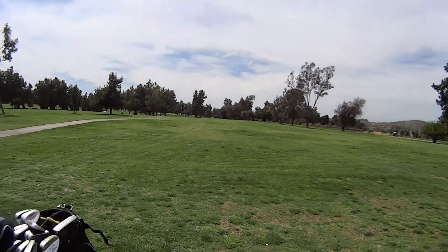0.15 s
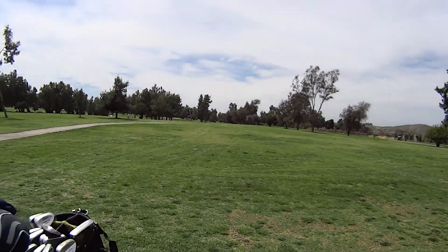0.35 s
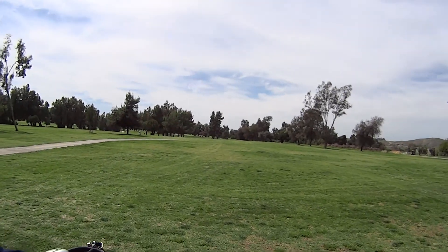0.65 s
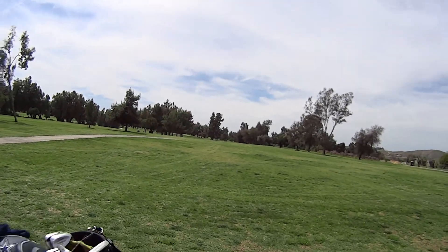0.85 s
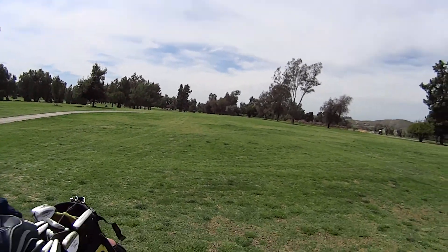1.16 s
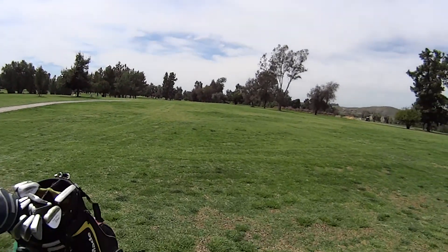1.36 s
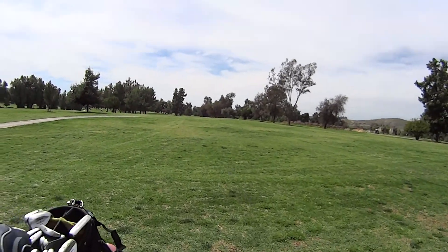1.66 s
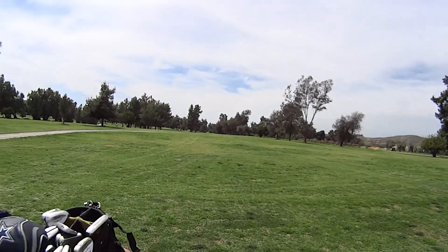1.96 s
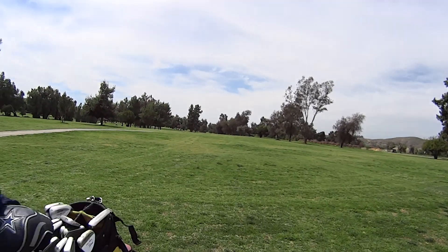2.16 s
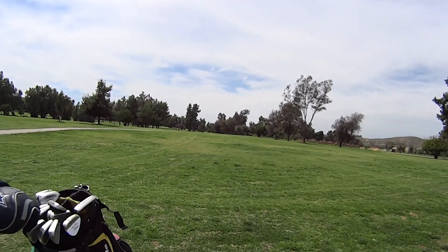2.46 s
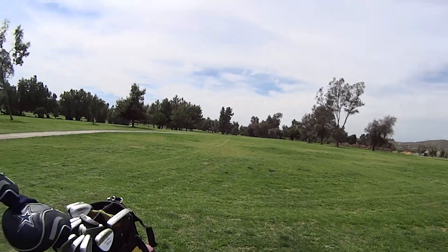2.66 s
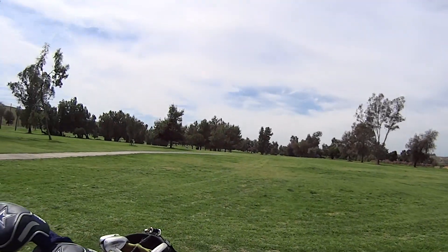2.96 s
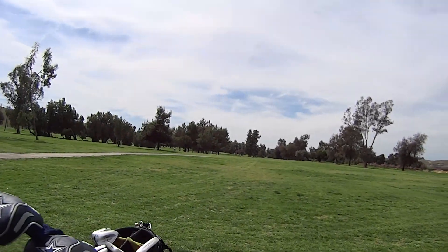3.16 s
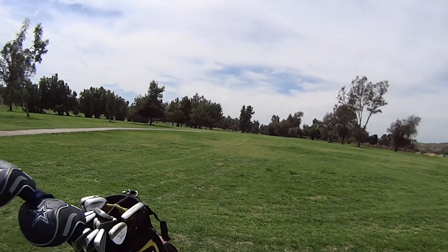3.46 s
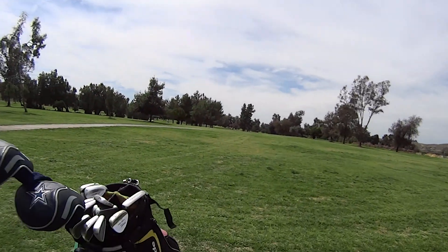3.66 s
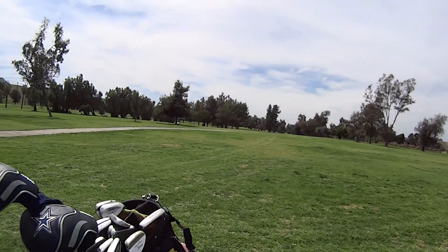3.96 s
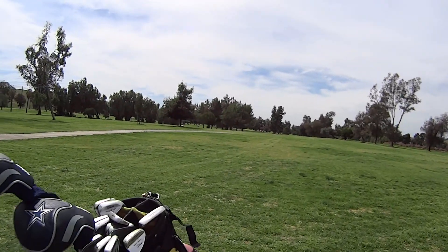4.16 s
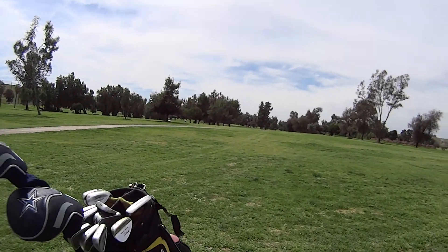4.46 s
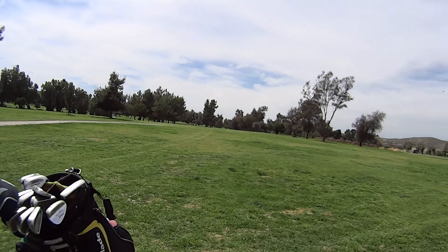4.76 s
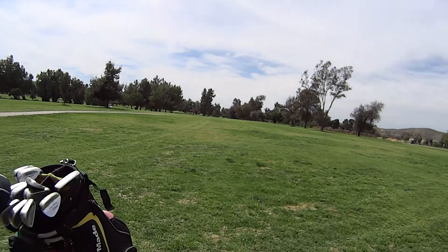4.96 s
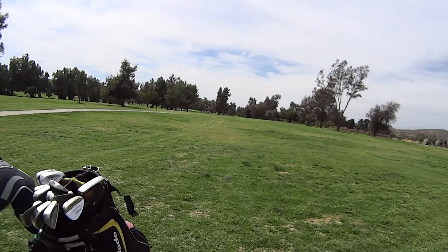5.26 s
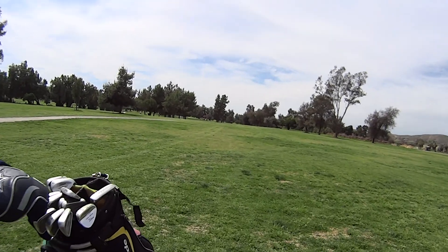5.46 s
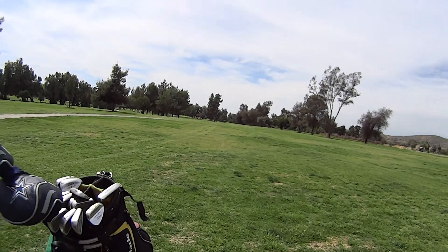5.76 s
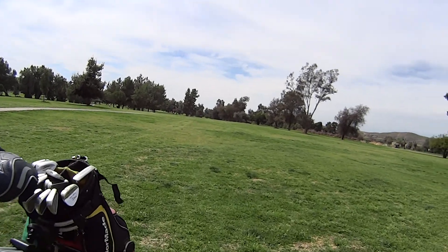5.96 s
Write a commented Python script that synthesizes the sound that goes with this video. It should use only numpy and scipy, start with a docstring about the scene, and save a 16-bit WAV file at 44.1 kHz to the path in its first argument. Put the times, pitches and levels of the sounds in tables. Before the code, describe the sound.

Outdoors on an open course, a bag of clubs is jostled beside a handheld camera. Bright dry clinks and lighter ticks build to a quick clattering burst, stop briefly, then return around two and three seconds. Later a club slides with a short scrape and a clink, and a few faint taps remain. Soft grass rolling, low wind, airy hiss and muffled handling thuds continue around it.

```python
"""Irons clack together in a golf bag that rides along an open course, close to the camera's microphone.
They rebound; each clack runs down a shaft and comes back smeared into a short chirp of echoes.
Loose shafts hold clean notes, one club slides on the bag's rim as slip noise, and dull handling
bumps on the camera ring damped low modes. Around them: steady outdoor hiss, rolling over grass
and the rumble of light wind, all shaped noise."""
import sys
import numpy as np
from scipy.fft import rfft, irfft, next_fast_len
from scipy.io import wavfile
from scipy.ndimage import map_coordinates

SR = 44100
rng = np.random.default_rng(int(sys.argv[2]) if len(sys.argv) > 2 else 0)


def master(y):
    """Save y as 16-bit WAV."""
    cut = np.clip(np.atleast_2d(y).T, -1, 1)
    pcm = np.round(cut * 32767)  # scale
    wavfile.write(sys.argv[1], SR, pcm.astype(np.int16))


N = 269010  # samples

# Club contacts, levels ahead of the stereo placing and the microphone ports: (time [s], clack level [dB],
# chatter rate [Hz], tilt [dB per octave], shaft level before the ring trim [dB], shaft note [Hz])
CONTACTS = [(0.0648, -35.5, 3110, -1, -41.5, 2090), (0.0953, -44, 2580, 2, -53, 2350),
            (.1424, -42.5, 2440, -2, -50, 2090), (.1863, -32, 2720, -0.5, -43, 2060),
            (0.316, -43.5, 2330, -5.5, -49, 2455), (0.3443, -45, 2430, -12, -52, 1970),
            (0.374, -47, 2740, -9, -55, 2140), (0.4893, -48, 1550, -5, -44, 2073),
            (0.5216, -45.5, 2610, -1.5, -43.5, 5200), (.64, -31.5, 3240, 3, -41, 2008),
            (.7071, -46, 3060, 2.5, -58, 2230), (.806, -31.5, 4500, 0, -39, 2530),
            (.8175, -39, 1810, -6, -42, 2035), (0.9556, -32.5, 1740, 6, -42, 4560),
            (.9882, -26, 3220, -0.5, -36, 3080), (1.0283, -46, 2560, -20, -49.5, 1550),
            (1.1154, -34, 1740, 0.5, -41.5, 3180), (1.14, -48, 1580, 2, -51, 1720),
            (1.1683, -29, 2300, -6.5, -40, 2040), (1.1798, -23, 1860, -3, -36, 2103),
            (1.2132, -29, 4400, 2.5, -39.5, 2990), (1.22, -29.5, 3100, 18, -44, 3170),
            (1.23, -33, 4930, -9, -47, 2160), (1.237, -34, 2270, -3, -43, 2650),
            (1.299, -40.5, 2400, -7, -44.5, 2390), (1.3184, -35.5, 4670, -1, -47, 2190),
            (1.342, -33.5, 1490, -4, -40, 1650), (1.35, -38, 5570, -10, -42, 4720),
            (1.357, -41, 2580, 7, -44.5, 2600), (1.3768, -36.5, 2380, -3.5, -45, 2360),
            (1.3872, -42, 1800, -2, -46, 2290), (1.419, -48, 2300, -4, -52, 2270),
            (1.4424, -38, 4450, -3, -41, 2000), (1.9365, -33, 1560, -3, -43.5, 2430),
            (2.0418, -39.5, 4870, -6.5, -46.5, 3940), (2.1869, -39, 2270, -3, -42, 2125),
            (2.2127, -35.5, 4420, -4, -43.5, 2050), (2.2218, -37, 1690, 0, -43.5, 2470),
            (2.2428, -46, 2510, -11, -54, 2340), (2.2789, -36, 4960, -5.5, -41.5, 2030),
            (2.3215, -37.5, 1504, -3, -48, 3300), (2.3602, -38, 3100, 3, -47.5, 3030),
            (2.683, -45.5, 2770, 3, -57, 2000), (2.7452, -45, 2460, -4, -49, 2430),
            (2.7883, -34, 4330, -4, -43.5, 2060), (2.887, -49.5, 2920, -5, -64, 2290),
            (3.042, -27, 4250, -1.5, -36.5, 2075), (3.0619, -43, 4770, -7.5, -46, 2490),
            (3.072, -46, 2460, -3, -49, 2000), (3.159, -45.5, 3980, -10, -61, 2400),
            (3.3872, -51, 2660, -4, -57.5, 2130), (3.5705, -37, 4570, -3, -45.5, 2020),
            (3.6082, -49, 2526, -2, -48.5, 2520), (3.6184, -43.5, 5170, -6, -49, 2580),
            (3.664, -49.5, 5300, -14, -66, 2090), (4.0404, -40, 4340, -10, -48, 2060),
            (4.1601, -47, 2480, 0.5, -56, 1690), (4.334, -51, 2410, -12, -57, 2350),
            (4.6726, -36.5, 2600, -4, -36.5, 2406), (4.6915, -44, 2220, -15, -47, 2150),
            (5.1573, -52, 2100, -18, -59, 2110), (5.2022, -38, 3190, -15, -47, 3060),
            (5.549, -52, 2430, -20, -57, 2120)]


def amp(db):
    """Decibels to an amplitude factor."""
    return 10 ** (np.asarray(db) / 20)


def unit(x):
    """x scaled to an rms of 1."""
    return x / np.sqrt(np.mean(x ** 2) + 1e-20)


def along(points, hz):
    """Interpolate (Hz, value) points on a log frequency axis."""
    f, v = np.transpose(points)
    return np.interp(np.log(hz + 1), np.log(f + 1), v)


def hump(hz, centre, width):
    """A resonance's outline: 1 at its centre, half at half its width away, 0 far off."""
    return 1 / (1 + (2 * (hz - centre) / width) ** 2)


def curves(rows):
    """One value per sample for each column after the time."""
    s, *columns = np.transpose(rows)
    return [np.interp(np.arange(N) / SR, s, column) for column in columns]


def swells(rows):
    """Gain per sample of smooth rises and falls; a length runs from the peak to e^-2 of it."""
    t = np.arange(N) / SR
    return sum(amp(db) * np.exp(-2 * ((t - s) / length) ** 2) for s, db, length in rows)


def wobble(rate):
    """A smooth random curve, rate knots a second."""
    knots = rng.standard_normal(int(N * rate / SR) + 4)
    return map_coordinates(knots, [np.arange(N) * rate / SR])


def filtered(x, response):
    """x passed through a response given as a function of frequency."""
    m = next_fast_len(N + SR // 2)
    return irfft(rfft(x, m) * response(np.fft.rfftfreq(m, 1 / SR)), m)[..., :N]


def causal(db):
    """The minimum-phase response with these gains, which rings only after the blow."""
    cepstrum = irfft(np.log(amp(db)))
    half = len(cepstrum) // 2
    fold = np.r_[1, np.full(half - 1, 2), np.zeros(half)]
    return np.exp(rfft(cepstrum * fold))


def add(track, s, sound):
    """Mix a sound in at time s."""
    part = track[..., max(round(s * SR), 0):][..., :sound.shape[-1]]
    part += sound[..., :part.shape[-1]]


def at_level(x, db, span):
    """x scaled to an rms level over its first span seconds."""
    energy = np.sum(x[..., :int(span * SR)] ** 2, axis=-1, keepdims=True)
    return x * amp(db) / np.sqrt(energy / (span * SR))


def rush(colour, alike):
    """Stereo noise of rms 1: colour gives dB by frequency, alike the left-right correlation."""
    def mid_side(hz):
        turn = np.arccos(np.clip(along(alike, hz), -1, 1)) / 2
        return amp(colour(hz)) * np.array([np.cos(turn), np.sin(turn)])

    mid, side = filtered(rng.standard_normal((2, N)), mid_side)
    return unit(np.array([mid + side, mid - side]))


def outdoors():
    """Steady hiss, the soft noise of rolling over grass, and wind rumble mostly alike in both ears."""
    # hiss and rumble spectra: (frequency [Hz], relative level [dB])
    hiss_colour = [(80, -10), (200, -7.5), (500, -2), (800, -2), (1400, -4.5), (2100, -4), (3300, -9),
                   (5300, -9), (7500, -12.5), (8600, -15.5), (10500, -14)]
    rumble_colour = [(10, -21), (20, -2.5), (32, -5), (44, 3.5), (60, -7.5), (87, -11.5), (200, -21),
                     (400, -25.5), (880, -68)]
    # stereo image of hiss and grass: (frequency [Hz], left-right correlation [-1 to 1])
    alike = [(100, 1), (300, -0.29), (650, -0.62), (1400, -0.6), (2400, 0.033), (5000, 0.33), (10000, 0.67)]
    # rolling over grass: (time [s], level before the trim and unsteadiness below [dB])
    rolling_levels = [(0, -59), (.2, -57), (.8, -62.5), (1.15, -58), (1.6, -61.5), (2.8, -64.5), (4.4, -68),
                      (5.1, -64.5), (6.1, -68)]
    # the wind freshens, on top of the calm: (time [s], level before the flutter [dB], length [s])
    gusts = [(.29, -57, .16), (1, -62, .15), (1.38, -55.5, 0.13), (1.97, -63, 0.078), (2.6, -60, 0.25),
             (4.88, -57, .09)]
    hiss_db, rolling_trim_db, calm_db = -56, -3, -62.5
    flutter_db, flutter_per_s = 1.2, 11  # quick unsteadiness of the wind

    hiss = rush(lambda hz: along(hiss_colour, hz), alike)
    grass_colour = [(50, -33), (130, 1), (350, -3.5), (900, -8.5), (2000, -7), (6000, -62)]
    grass = rush(lambda hz: along(grass_colour, hz), alike)
    rumble = rush(lambda hz: along(rumble_colour, hz), [(40, 1), (100, 0.93), (300, 0.77)])

    rolling, = curves(rolling_levels)
    grass_gain = amp(rolling + rolling_trim_db + 3.1 * wobble(18))
    wind_gain = (amp(calm_db) + swells(gusts)) * amp(flutter_db * wobble(flutter_per_s))
    return amp(hiss_db) * hiss + grass_gain * grass + wind_gain * rumble


def rubbing(rustle_trim_db=-1, rest_db=-68, unrest_db=2.0, slide_grain_db=3.0, rustle_grain_db=3.5):
    """Shafts rub on the bag in small slips: faintly as it sways, loudly when one club slides."""
    # the slide of one club: (time [s], scrape level before the stereo lean [dB])
    slide_levels = [(4.58, -58.5), (4.615, -57), (4.66, -50.5), (4.678, -43), (4.725, -48.5), (4.75, -53),
                    (4.78, -67)]
    # the bag sways and its shafts rub: (time [s], rustle level before the trim and lean [dB], length [s])
    sways = [(.323, -60.5, 0.14), (1.05, -60.5, 0.28), (1.357, -53, 0.18), (1.798, -56, 0.046),
             (2.172, -62.5, 0.14), (2.525, -60.5, 0.078), (3.141, -63, 0.2), (4.136, -59.5, 0.053),
             (4.403, -68, 0.21), (4.886, -62.5, 0.21), (5.32, -59, 0.058), (5.555, -60, 0.037)]
    # scrape and rustle spectra: (frequency [Hz], relative level [dB])
    scrape_colour = [(300, -17.5), (1200, -12.5), (1900, -3.5), (2230, 5.5), (2750, -14), (3800, -8),
                     (6000, -13), (8300, -20), (11000, -23)]
    rustle_colour = [(300, -20), (1400, -10), (1900, -8.5), (2200, 3), (2650, -11.5), (5300, -8.5),
                     (8000, -22), (11000, -25)]

    t = np.arange(N) / SR
    slide, = curves(slide_levels)
    sliding = (t > slide_levels[0][0]) & (t < slide_levels[-1][0])
    sway = amp(rest_db + unrest_db * wobble(7)) + amp(rustle_trim_db) * swells(sways)

    # fast random level changes give the noise its grain of slips
    scrape = rush(lambda hz: along(scrape_colour, hz), [(2000, 0.78)])
    scrape = unit(scrape * amp(slide_grain_db * wobble(260)))
    rustle = rush(lambda hz: along(rustle_colour, hz), [(2000, 0.66)])
    rustle = unit(rustle * amp(rustle_grain_db * wobble(170)))
    lean = amp([[1], [-1]])  # 1 dB up on the left, 1 dB down on the right
    return (sliding * amp(slide) * scrape + sway * rustle) * lean


def ticks(count=140):
    """Light contacts at random moments, more and firmer while the bag is jostled."""
    # how much the bag is jostled: (time [s], share of the full tick rate [0 to 1])
    jostling = [(0, .1), (.35, .6), (.7, .05), (1.25, 1), (1.55, .02), (2.25, .4), (2.5, .02), (3.2, .3),
                (3.8, .05), (6.1, .02)]
    full_per_s, tilt = 20, -8  # rate at full jostle [per second], tilt [dB per octave]
    clack_db, shaft_db = -47, -54.5  # mean levels at full jostle, the shaft before the ring trim
    spread_db, calm_db = 0.5, -6  # random spread, and how much lighter when the bag is still
    chatter_range, note_range = (2000, 4600), (1990, 2480)  # Hz

    when, chance, chatter, note = rng.random((count, 4)).T
    s = when * N / SR
    jostle = np.clip(np.interp(s, *np.transpose(jostling)), 0, 1)
    force_db = calm_db * (1 - jostle) + spread_db * rng.standard_normal(count)
    happens = chance < jostle * full_per_s * N / SR / count
    chatter_hz = np.interp(chatter, [0, 1], chatter_range)
    note_hz = np.interp(note, [0, 1], note_range)
    rows = np.column_stack([s, clack_db + force_db, chatter_hz, np.full(count, tilt),
                            shaft_db + force_db, note_hz])
    return rows[happens]


def rebounds():
    """The heads part and meet once more, softer and duller; a harder knock stays apart for longer."""
    flight_s, typical_db = .0072, -39  # flight after a typical clack, and the level of that clack
    flight_grows = .2  # dB of flight time per dB of clack
    softer_db, duller = -12, -4  # dB, dB per octave
    shaft_softer_db = -21  # it hardly shakes the shaft again
    rows = []
    for s, db, chatter_hz, tilt_db, shaft_db, ring_hz in CONTACTS:
        flight = flight_s * amp(flight_grows * (db - typical_db))
        rows.append((s + flight, db + softer_db, chatter_hz, tilt_db + duller,
                     shaft_db + shaft_softer_db, ring_hz))
    return rows


def clack(hz, db, chatter_hz, tilt_db, depth_db=5.5, ripple_db=2, pivot_hz=4000, smear=0.000389):
    """Two heads meet and chatter for a millisecond, which raises the multiples of the chatter rate."""
    # clack spectrum: (frequency [Hz], relative level [dB])
    clack_colour = [(300, -32.5), (1100, -35), (1800, -15.5), (3100, 4.5), (4400, 0.5), (5600, 3),
                    (7300, -6), (8600, -20), (9700, -21.5), (11500, -30.5)]
    # each contact has its own random ripple over frequency
    spot = np.interp(hz, np.linspace(0, SR / 2, num=48), rng.standard_normal(48))
    chatter = depth_db * np.cos(2 * np.pi * hz / chatter_hz)
    # hard contacts are bright, soft ones dull
    hardness = tilt_db * np.log2(np.maximum(hz, 1800) / pivot_hz)
    colour = along(clack_colour, hz) + chatter + hardness + ripple_db * spot
    # in the metal the treble runs slightly ahead: the delay is smear seconds at the pivot
    travel = np.exp(-4j * np.pi * smear * np.sqrt(hz * pivot_hz))
    return at_level(irfft(causal(colour) * travel), db, span=0.0013)


def steel(size, spread_db=5):
    """The heads ring briefly, with new strengths at every contact, damped by their neighbours."""
    # modes of the iron heads: (frequency [Hz], mean relative level [dB], t60 [s])
    head_modes = [(3285, 3, 0.065), (3315, 1, 0.17), (3960, 12, 0.037), (4250, -30, 0.061), (4260, 5, 0.05),
                  (5100, 16, 0.064), (5740, -4, 0.096), (6060, -5, 0.036), (7340, -6, 0.058)]
    t = np.arange(size) / SR
    hz, db, t60 = np.transpose(head_modes)[..., None]
    strength = amp(spread_db * rng.standard_normal(hz.shape))
    strength = strength * np.sign(rng.standard_normal(hz.shape))
    modes = strength * amp(db - 60 * t / t60) * np.sin(2 * np.pi * hz * t)
    return at_level(np.sum(modes, axis=0), 0, span=0.0056)


def shaft(hz, db, ring_hz, tilt_db, trip=.0043, trip_hz=2100, keep=0.59, scatter=1.0,
          tone=0.076, tone_t60=0.054, tilt_share=0.47):
    """Bending waves bounce along a shaft, treble first, settle into one mode and scatter into other clubs."""
    # shaft spectrum: (frequency [Hz], relative level [dB])
    shaft_colour = [(300, -29.5), (1100, -24), (1550, -7), (2100, 0.5), (3000, -4.5), (5200, -5),
                    (7000, -10), (8600, -21), (11000, -21.5)]
    t = np.arange(2 * (len(hz) - 1)) / SR
    # bending waves travel with the square root of frequency: about trip seconds there and back at trip_hz
    round_trip = trip * np.exp(.1 * rng.standard_normal())
    turn = np.exp(-4j * np.pi * round_trip * np.sqrt(hz * trip_hz))
    echoes = turn / (1 - np.clip(keep, 0, .9) * turn)  # every bounce keeps this share

    # scattered waves: noise with a fast decay and a faint slow one
    fade = (1 - np.exp(-t / 0.00057)) * (amp(-60 * t / 0.029) + amp(-16.5 - 60 * t / 0.2))
    jangle = rng.standard_normal((2, len(t))) * fade / np.linalg.norm(fade)
    jangle += 0.59 * jangle[::-1]  # the two ports hear much the same

    colour = along(shaft_colour, hz) + tilt_share * tilt_db * np.log2(np.maximum(hz, 1800) / 4000)
    waves = irfft(causal(colour) * (echoes + scatter * rfft(jangle)))
    mode = np.sin(2 * np.pi * ring_hz * t) * (1 - np.exp(-t / 0.0019)) * amp(-60 * t / tone_t60)
    return at_level(waves / np.linalg.norm(waves[0]) + tone * mode, db, span=0.003)


def clubs(ring_trim_db=-2.0, steel_db=-20.5, lead=.0006, size=8192):
    """Every contact is a clack, a short ring of the heads and the answer of a shaft, a little to the left."""
    # where the clubs are heard: (frequency [Hz], left minus right [dB])
    club_side = [(1600, -1.5), (2050, 0), (2450, 4.5), (3700, 1), (4600, 2.5), (6200, -0.5), (7200, 6.5),
                 (9000, 6.5)]
    out, hz = np.zeros((2, N)), np.fft.rfftfreq(size, 1 / SR)
    for s, db, chatter_hz, tilt_db, shaft_db, ring_hz in [*CONTACTS, *rebounds(), *ticks()]:
        heads = clack(hz, db, chatter_hz, tilt_db) + amp(db + steel_db) * steel(size)
        answer = shaft(hz, shaft_db + ring_trim_db, ring_hz, tilt_db)
        add(out, s - lead, heads + answer)  # placed lead seconds before the listed time

    def placing(hz):
        return np.array([causal(side * along(club_side, hz)) for side in (.5, -.5)])

    return filtered(out, placing)


def free_shafts(attack=0.0011):
    """A shaft that nothing touches swings on after a contact and holds one clean note for a moment."""
    # notes: (time [s], pitch [Hz], starting level of the decay [dB], t60 [s])
    notes = [(.19, 1450, -41, 0.027), (.317, 2460, -37, 0.034), (.495, 2060, -47, 0.099),
             (.527, 2000, -46, 0.042), (1.168, 4690, -36, .025), (1.938, 2390, -36, 0.031),
             (4.716, 2210, -44, .06), (5.203, 3120, -42, 0.029), (5.205, 1655, -47, 0.081)]
    out, t = np.zeros((2, N)), np.arange(SR // 5) / SR
    for s, hz, db, t60 in notes:
        envelope = amp(db - 60 * t / t60) * (1 - np.exp(-t / attack))
        add(out, s, envelope * np.sin(2 * np.pi * hz * t))
    return out


def soft_ring(modes, soft_hz, t):
    """Damped modes struck softly: those well above soft_hz are hardly excited."""
    ring = np.zeros(len(t))
    for hz, db, t60 in modes:
        excited = 1 / (1 + (hz / soft_hz) ** 4)
        ring += excited * amp(db - 60 * t / t60) * np.sin(2 * np.pi * hz * t)
    return ring


def handling_bumps(knock_trim_db=4.5, thud_delay=0.00415, shudder_db=-12.0, shudder_t60=0.2):
    """A soft handling knock on the camera, a low thud just after it, and a short noisy shudder."""
    # dull bumps: (time [s], knock gain before the trim [dB], thud gain [dB],
    # pitch where the soft contact excites a mode by half [Hz])
    bump_rows = [(0.426, -48.5, -47, 626), (.924, -45.5, -60, 900), (1.062, -48, -53, 700),
                 (1.917, -41.5, -37, 2200), (1.983, -49, -59, 1300), (4.407, -56, -66, 2500),
                 (4.939, -43, -43.5, 1900), (5.467, -56.5, -62, 2500)]
    # what a bump rings with: (frequency [Hz], relative level [dB], t60 [s])
    knock_modes = [(1420, 4.5, 0.017), (1180, 8, 0.0069), (740, -5, 0.026), (524, -2.5, 0.027)]
    thud_modes = [(133, -1.5, 0.063), (233, -1, 0.037), (370, -11.5, 0.043)]

    out, shake, t = np.zeros((2, N)), np.zeros(N), np.arange(SR // 5) / SR
    onset = 1 - np.exp(-t / 0.0013)
    for s, knock_db, thud_db, soft_hz in bump_rows:
        add(out, s, amp(knock_db + knock_trim_db) * onset * soft_ring(knock_modes, soft_hz, t))
        add(out, s + thud_delay, amp(thud_db) * onset * soft_ring(thud_modes, soft_hz, t))
        add(shake, s, amp(max(knock_db, thud_db) + shudder_db - 60 * t / shudder_t60))
    shudder_colour = [(40, -26), (130, 4), (450, -16), (1200, -6.5), (4000, -30)]
    return out + shake * rush(lambda hz: along(shudder_colour, hz), [(300, 0.68)])


def scene():
    """Open air, the rubbing bag, handling bumps, and the clubs."""
    return outdoors() + rubbing() + handling_bumps() + free_shafts() + clubs()


def record(dry, top_hz=11110):
    """Each microphone port adds its own resonances; a steep low-pass leaves nothing above top_hz."""
    # resonances of the two ports: (frequency [Hz], width [Hz], left gain [dB], right gain [dB])
    ports = [(2094, 140, 2, 0.5), (2473, 110, 5.5, -1), (5360, 290, 1, 2.5), (8160, 420, 2.2, -1),
             (9780, 1300, 5, 4.5)]

    def port(hz, channel):
        return causal(sum(gains[channel] * hump(hz, centre, width) for centre, width, *gains in ports))

    coloured = filtered(dry, lambda hz: np.array([port(hz, channel=0), port(hz, channel=1)]))
    return filtered(coloured, lambda hz: 1 / np.sqrt(1 + (hz / top_hz) ** 260))


dry = scene()
out = record(dry)
master(out)
```